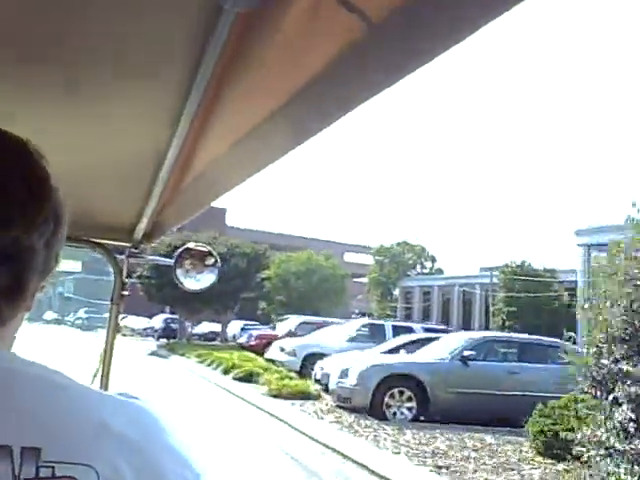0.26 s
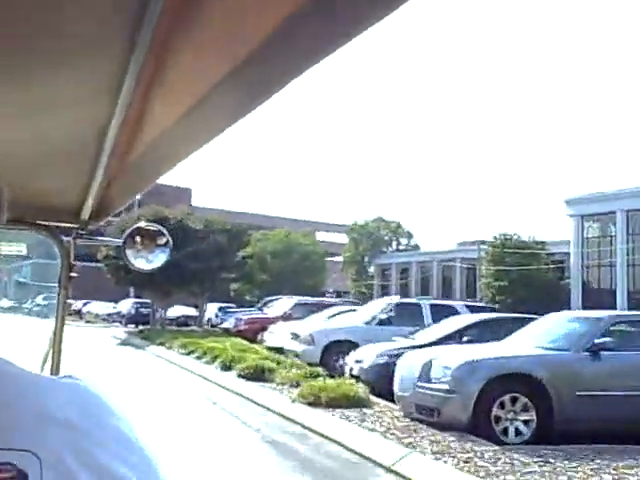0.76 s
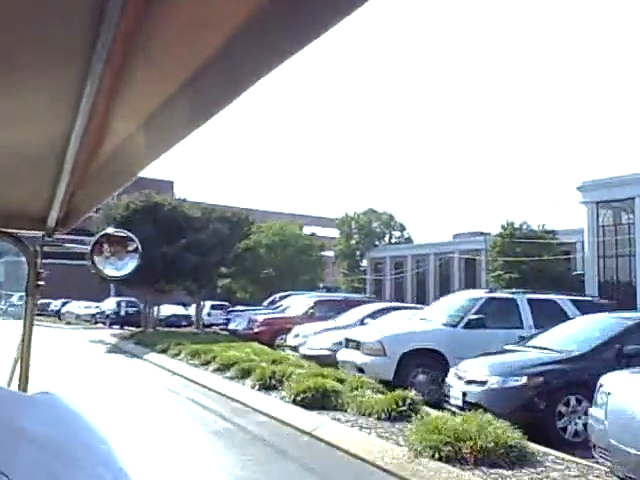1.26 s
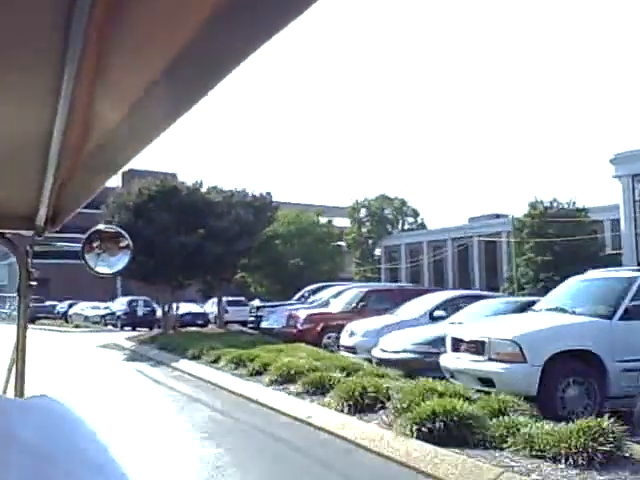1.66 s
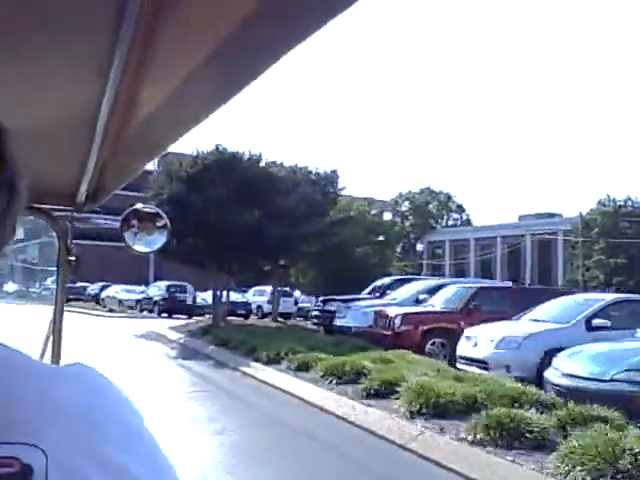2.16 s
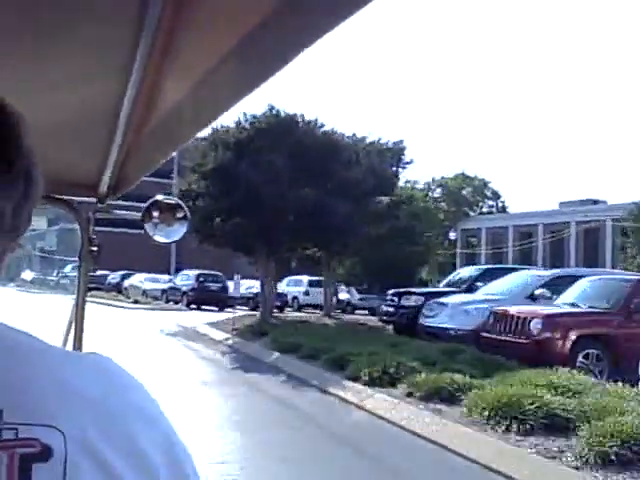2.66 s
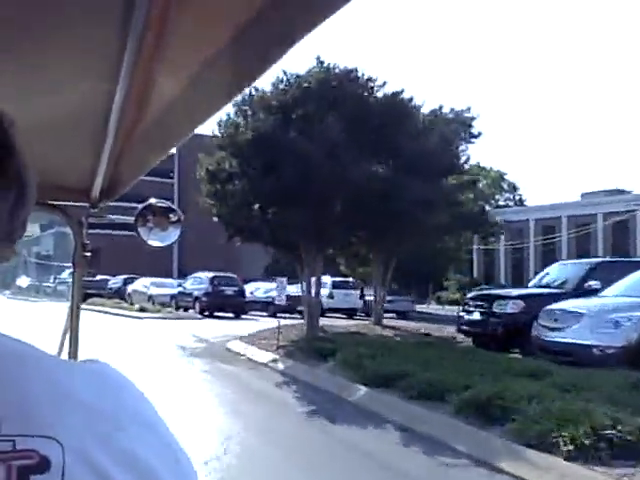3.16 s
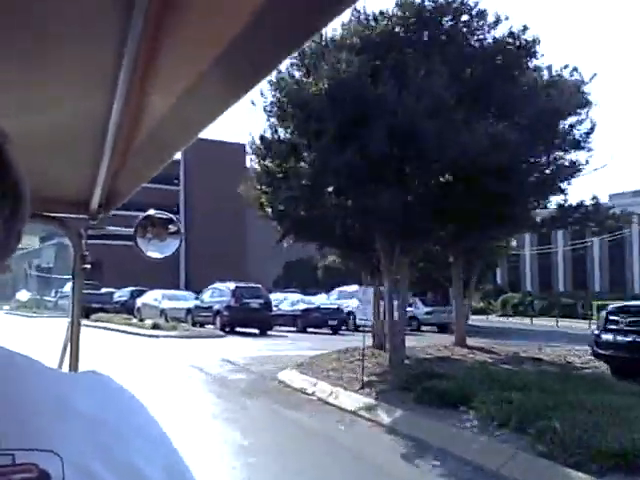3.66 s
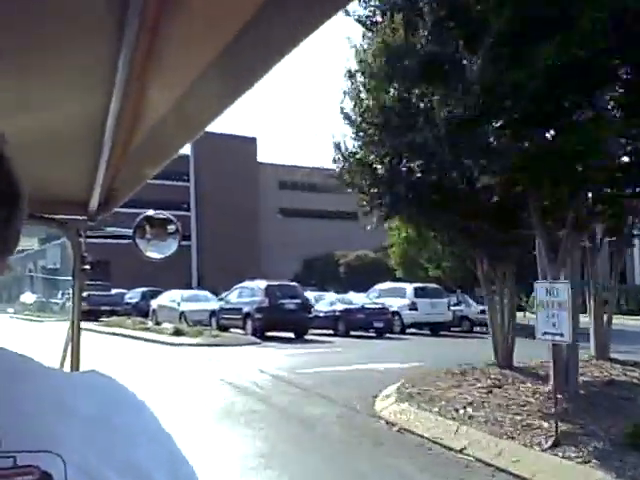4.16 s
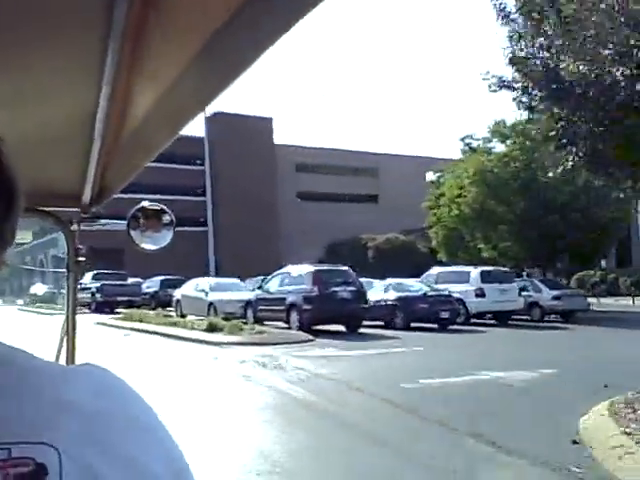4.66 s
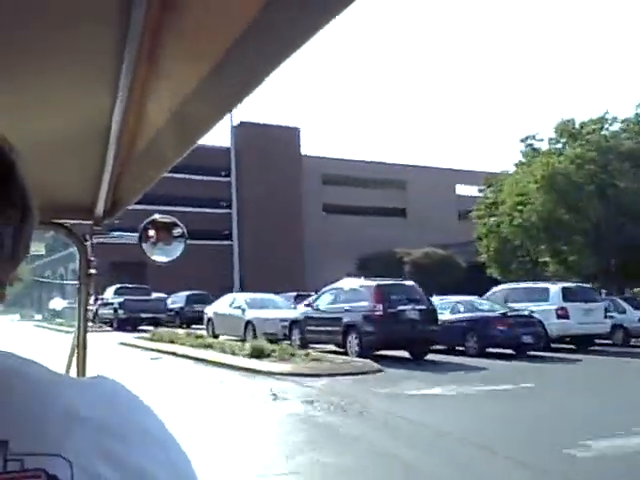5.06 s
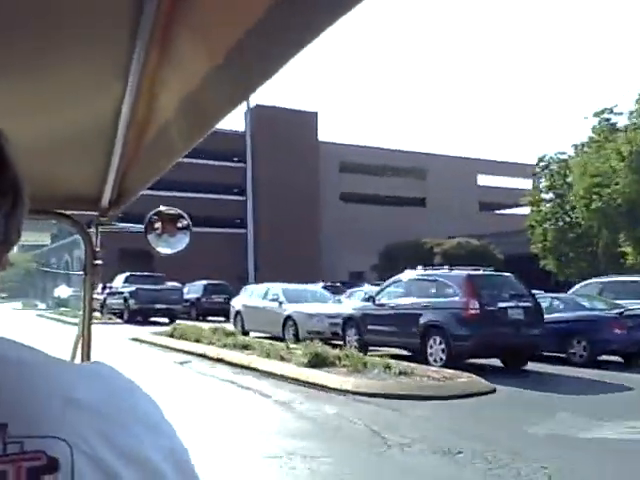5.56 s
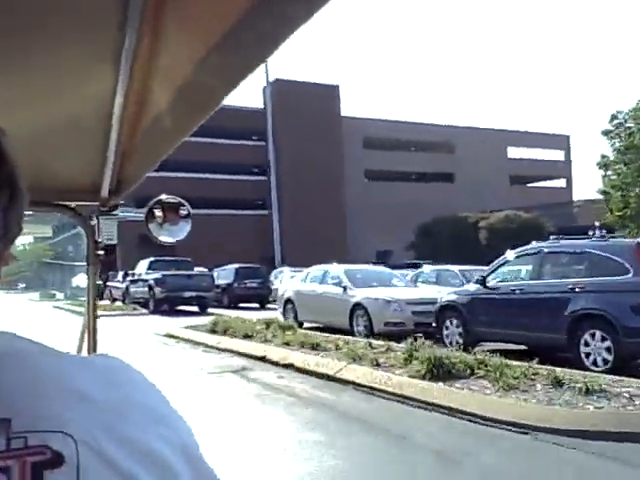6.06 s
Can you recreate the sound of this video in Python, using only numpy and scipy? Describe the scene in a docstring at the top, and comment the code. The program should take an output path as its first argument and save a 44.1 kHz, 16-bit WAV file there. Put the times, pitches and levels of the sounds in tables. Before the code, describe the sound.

Inside a slow open-sided shuttle outdoors, a low eight-cylinder throb near 60 hertz wavers gently beneath continuous fan, tyre and body roar. From about 0.1 to 0.9 seconds, wind hits the bare microphone in dense fluttering thuds and crackles, the hardest near 0.35, with a tiny roof squeak and metallic clink around 0.4 and another near 0.7. Calmer rumble follows until 1.7, when a second run of buffets lasts to about 2.4, with a faint squeak near 2.1. Then mostly engine and road roar, with small loose-metal ticks around 2.6 to 3.4. A sharp wind thump lands near 3.9, a clear clink near 4.6, and clustered gusts from 4.9 to 5.6. The engine drops slightly in pitch and softens around 5.4, then recovers as low, soft wind thuds arrive near 6.1. Close small-camera sound, with rounded peaks and limited treble.

```python
"""Open-sided shuttle in a car park

An open-sided shuttle rolls slowly, heard by a small camera on a passenger seat. Fan, tyre and body roar is
banded noise; gusts and sharp eddies on the bare microphone are noise swells and band-limited pressure spikes.
Loose fittings clink as struck modes, a roof joint squeaks in overtones, and an eight-cylinder engine throbs
near idle as a stack of wavering order lines.
"""
import sys
import numpy as np
from scipy import signal
from scipy.fft import rfft, irfft
from scipy.io import wavfile
from scipy.ndimage import uniform_filter1d

SR = 44100
rng = np.random.default_rng(int(sys.argv[2]) if len(sys.argv) > 2 else 0)


def persist_wave(psi):
    """Save psi, clipped to +-1, as 16-bit WAV."""
    counts = np.round(np.clip(psi, -1, 1) * 32767).astype(np.int16)
    wavfile.write(sys.argv[1], SR, np.atleast_2d(counts).T)


N = 277830


def undb(db):
    """Decibels to amplitude."""
    return 10 ** (np.asarray(db) / 20)


def unit(x):
    """Scale to rms 1."""
    return x / np.sqrt(np.mean(x ** 2))


def curves(table):
    """Columns of a table joined by straight lines in time."""
    time_s, *columns = np.transpose(table)
    return [np.interp(np.arange(N) / SR, time_s, column) for column in columns]


def band(x, lo_hz, hi_hz, order=2):
    """Band-pass."""
    sos = signal.butter(order, [lo_hz, min(hi_hz, SR / 2.2)], "band", fs=SR, output="sos")
    return signal.sosfilt(sos, x)


def walk(rate_hz):
    """Random levels held 1 / rate_hz, smoothed twice; rms 1."""
    hold = int(SR / rate_hz)
    steps = np.repeat(rng.standard_normal(N // hold + 1), hold)
    return unit(uniform_filter1d(uniform_filter1d(steps, hold), hold)[:N])


def humps(peak_s, peak_db, rise_s, fall_s):
    """Summed power of exponential swells that peak at the given moments."""
    grid = np.arange(0, N, 32)
    t = grid / SR - np.asarray(peak_s)[:, None]
    shape = np.exp(np.where(t < 0, 2 * t / rise_s, -2 * t / fall_s))
    power = undb(2 * np.asarray(peak_db)) @ shape
    return np.interp(np.arange(N), grid, power)


# fan, tyre and body roar, relative spectrum: (frequency [Hz], density [dB per Hz])
ROAR_SPECTRUM = [(25, -25.5), (60, -16), (120, -19), (190, -16), (290, -23), (450, -37), (650, -27),
                 (800, -36.5), (1250, -35), (2100, -56), (3000, -47.5), (3700, -55), (4400, -62.5),
                 (5700, -54.5), (6600, -54), (7300, -73)]
ROAR_DB, FLICKER_DB = -30, 0.91


def roar(turn):
    """Third-octave noise bands flicker independently; valve gear pulses the roar at each firing."""
    out, (table_hz, table_db) = 0, np.transpose(ROAR_SPECTRUM)
    for hz in 25 * 2 ** (np.arange(26) / 3):
        density_db = np.interp(np.log(hz), np.log(table_hz), table_db)
        # bandwidth grows with hz
        db = density_db + 10 * np.log10(hz) + FLICKER_DB * walk(12)
        noise = band(rng.standard_normal(N), hz * 2 ** (-1 / 6), hz * 2 ** (1 / 6))
        out = out + undb(db) * unit(noise)
    pulse = 1 + 0.077 * np.cos(2 * np.pi * CYLINDERS * turn + 1.3)
    return undb(ROAR_DB) * unit(out) * pulse


# gust strength between the sharp eddies, drives all wind bands: (time [s], level [dB])
GUSTS = [(0, -47), (.09, -29.5), (.5, -31.5), (.93, -34), (1.05, -36.5), (1.4, -41), (1.62, -34.5),
         (1.7, -30.5), (2.36, -36.5), (2.46, -41.5), (2.8, -41), (2.93, -31), (3.3, -40), (3.65, -38.5),
         (4.1, -36.5), (4.3, -39.5), (4.65, -42), (4.75, -37.5), (5.1, -35), (5.25, -30.5), (5.38, -34.5),
         (5.45, -39), (5.95, -40.5), (6.05, -32.5), (6.15, -41.5), (6.3, -39)]
# strongest shoves of slow pressure, before SLOW_TRIM_DB: (time [s], level [dB])
SHOVES = [(.12, -17), (.19, -17.5), (0.351, -13.5), (.44, -23.5), (.51, -18), (.63, -32), (.86, -22),
          (.97, -33), (1.84, -23), (2.02, -27), (2.09, -18), (2.28, -17), (2.38, -16.5), (3.39, -20),
          (4.7, -20), (5.54, -21), (6.021, -25), (6.16, -20)]
SHOVE_S = 0.045  # rise and fall
SWELL_DB, SWELL_WANDER_DB, SLOW_TRIM_DB = 1.5, 3, -0.8  # swell is relative to the gust
# stream swell around each sharp eddy, level relative to its thud
WAKE_DB, WAKE_RISE_S, WAKE_FALL_S = -11.5, 0.0059, 0.015


def wind():
    """Small eddies roll over the capsule in an uneven stream; slow pressure swells lie under them."""
    calm_db, = curves(GUSTS)
    eddy_s, _, thud_db, *_ = np.transpose(SHARP_EDDIES)
    stream_db = calm_db + 2.7 * walk(14)
    wakes = humps(eddy_s, thud_db + WAKE_DB, WAKE_RISE_S, WAKE_FALL_S)
    gust_db = 10 * np.log10(undb(2 * stream_db) + wakes)
    swell_db = calm_db + SWELL_DB + SWELL_WANDER_DB * walk(8.5)
    swell_power = undb(2 * swell_db) + humps(*np.transpose(SHOVES), SHOVE_S, SHOVE_S)
    jag_db = 1.5 * (walk(90) + .7 * walk(250))
    noise = rng.standard_normal((4, N))
    low = unit(band(noise[0], 90, 230)) * undb(0.4 * gust_db + 0.38 * calm_db - 4.0)
    mid = unit(band(noise[1], 210, 480)) * undb(gust_db - 1.0)
    # stronger gusts shed smaller eddies, so the upper band grows faster than the gust
    upper = unit(band(noise[2], 620, 1400)) * undb(1.22 * gust_db - 10.5)
    slow = unit(band(noise[3], 18, 48)) * np.sqrt(swell_power) * undb(SLOW_TRIM_DB)
    return undb(jag_db) * (low + mid + upper) + slow


SMALL_PER_S, SMALL_HZ = 40, 450
SMALL_DB, SMALL_SPREAD_DB = 3, 2.5  # thud relative to the gust
SMALL_SNAP_DB, SMALL_CRACK_DB = -19, -28  # relative to the thud


def small_eddies():
    """Rows like the sharp eddies, at random moments, their strength following the gust."""
    count = int(SMALL_PER_S * N / SR)
    time_s = .02 + rng.random(count) * (N / SR - .02)
    a, b, c = rng.standard_normal((3, count))
    thud_db = np.interp(time_s, *np.transpose(GUSTS)) + SMALL_DB + SMALL_SPREAD_DB * a
    snap_db = thud_db + SMALL_SNAP_DB + 3.1 * b
    crack_db = thud_db + SMALL_CRACK_DB + 4.4 * b
    return np.transpose([time_s, SMALL_HZ * 2 ** (0.45 * c), thud_db, snap_db, crack_db])


# sharpest eddies, levels before the part gains:
# (time [s], thud pitch [Hz], thud peak [dB], snap peak [dB], crack peak [dB])
SHARP_EDDIES = [(0.0852, 520, -17, -32, -41), (0.1134, 610, -15.5, -26, -38),
                (0.1854, 570, -15.5, -44, -42), (0.1647, 400, -32, -37, -46), (0.1976, 420, -17, -31, -42),
                (0.203, 420, -14, -24, -30), (0.2105, 420, -21, -32, -42), (0.224, 620, -17, -27, -39),
                (0.2442, 430, -22, -26, -45), (0.352, 520, -7, -10, -25), (0.3612, 553, -12, -9.5, -37),
                (0.3972, 520, -11.5, -34, -40), (0.4162, 400, -25, -29, -41),
                (0.4353, 490, -12.5, -23.5, -35), (0.467, 436, -17, -39, -48), (0.4961, 580, -24, -36, -44),
                (0.5087, 696, -16, -32, -43), (0.5337, 560, -15, -27, -39), (0.5629, 630, -15.5, -46, -34),
                (0.614, 595, -27, -30, -46), (0.6318, 450, -13, -16, -31), (0.6352, 430, -8.5, -28, -40),
                (0.7082, 358, -15, -37, -47), (0.7456, 440, -15.5, -39, -31),
                (0.7483, 513, -12.5, -39, -35), (0.768, 450, -17.5, -23, -41), (0.7806, 503, -15, -23, -38),
                (0.816, 390, -21, -19, -41), (0.8469, 525, -9.5, -33, -33), (0.8509, 470, -11, -20, -29),
                (0.863, 520, -24, -36, -47), (0.907, 390, -12, -25, -45), (0.93, 450, -24, -41, -50),
                (1.6893, 470, -21, -43, -42), (1.7, 580, -9, -32, -32), (1.7085, 450, -13, -27, -42),
                (1.7284, 480, -12, -22, -34), (1.753, 600, -18.5, -28, -44), (1.7775, 730, -15.5, -33, -36),
                (1.7856, 645, -14, -40, -41), (1.8518, 448, -15, -30, -41), (1.8811, 540, -10.5, -31, -37),
                (1.9248, 410, -14, -39, -47), (2.0124, 560, -15, -11, -28.5),
                (2.0225, 660, -12.5, -26, -34), (2.035, 443, -23, -33, -46), (2.0432, 640, -15.5, -31, -40),
                (2.0886, 390, -14.5, -25, -38), (2.1026, 570, -17, -33, -37),
                (2.1357, 580, -14.5, -39, -43), (2.1768, 500, -18.5, -38, -33),
                (2.1838, 530, -14.5, -12, -38), (2.197, 440, -14, -32, -32), (2.209, 510, -15, -32, -44),
                (2.215, 600, -28, -29, -42), (2.235, 680, -20, -34, -46), (2.247, 517, -16, -32, -45),
                (2.2599, 420, -13.5, -20, -31), (2.2645, 600, -21, -15.5, -36),
                (2.2885, 400, -19, -24, -42), (2.2933, 430, -10, -21, -37), (2.3155, 402, -13, -31, -50),
                (2.3248, 420, -24, -28, -51), (2.3407, 400, -13.5, -26, -48),
                (2.3472, 420, -15.5, -29, -44), (2.3525, 500, -24.5, -41, -36),
                (2.409, 506, -16.5, -42, -36), (3.391, 373, -21, -41, -51), (3.439, 348, -18, -40, -40),
                (3.8065, 370, -16.5, -33, -43), (3.8605, 680, -7.5, -17.5, -26.5),
                (3.8661, 680, -11, -34, -37), (3.9976, 500, -24.5, -29, -57), (4.1819, 362, -19, -40, -53),
                (4.7184, 380, -17.5, -38, -51), (4.8972, 420, -16.5, -41, -39),
                (4.972, 450, -13.5, -18, -37), (4.9957, 470, -17, -22, -32), (5.0069, 430, -11, -18, -33),
                (5.0186, 550, -12, -25, -40), (5.096, 580, -26, -26, -46), (5.1015, 546, -23, -31, -38),
                (5.1085, 500, -20, -35, -37), (5.1145, 450, -12.5, -28, -35), (5.1245, 520, -16, -31, -36),
                (5.158, 580, -25, -39, -43), (5.1652, 480, -22, -40, -43), (5.2081, 510, -14, -38, -39),
                (5.2154, 536, -19.5, -36, -47), (5.2417, 600, -23, -44, -30), (5.3, 450, -17, -40, -48),
                (5.345, 500, -22, -38, -48), (5.393, 433, -23, -42, -46), (5.5673, 600, -16.5, -32, -35),
                (5.5827, 540, -17, -31, -41), (6.045, 190, -16, -37, -51), (6.09, 190, -16, -42, -50),
                (6.14, 178, -18, -44, -52)]
# envelopes of thud, snap and crack: (rise [s], fall [s], gain [dB])
EDDY_PARTS = [(0.0026, 0.0024, -0.5), (0.0019, 0.0018, -6.5), (0.00069, 0.0052, 5)]
SNAP_HZ, CRACK_HZ = 1210, 3370
SPIKE = 20  # multiple of a random draw


def buffets():
    """A sharp eddy is a pressure spike in noise, split into thud, snap and crack around one moment."""
    size, lead = 2048, 512
    out, t = np.zeros(N + size), (np.arange(size) - lead) / SR
    octaves = np.log2(np.arange(1, size // 2 + 2) * SR / size)
    shapes = [np.where(t < 0, np.exp(-(t / rise_s) ** 2), np.exp(-np.abs(t) / fall_s))
              for rise_s, fall_s, _ in EDDY_PARTS]
    for time_s, thud_hz, *parts_db in [*SHARP_EDDIES, *small_eddies()]:
        pressure = rng.standard_normal(size)
        pressure[lead] = SPIKE * np.sign(pressure[lead])
        start = int(time_s * SR) - lead
        bands = [(thud_hz, .55), (SNAP_HZ, .42), (CRACK_HZ, .85)]  # (centre [Hz], width [octaves])
        for db, (hz, width), shape, (_, _, gain_db) in zip(parts_db, bands, shapes, EDDY_PARTS):
            weight = np.exp(-((octaves - np.log2(hz)) / width) ** 2 / 2)
            wavelet = shape * irfft(rfft(pressure) * weight)
            out[start:start + size] += undb(db + gain_db) * wavelet / np.abs(wavelet).max()
    return out[:N]


# slips of a roof frame joint: (time [s], nominal level [dB], starting pitch [Hz], length [s])
SQUEAKS = [(0.395, -40, 1423, 0.026), (0.689, -41, 1450, 0.011), (2.108, -38.5, 1380, 0.0093)]
# overtones of a squeak: (multiple of pitch, relative level [dB])
SQUEAK_TONE = [(1, 12), (2, 5), (3, -4), (4, -5.5)]
SQUEAK_SAG_PER_S = 3.5  # share of starting pitch


def squeaks():
    """Regular stick-slip gives a brief stack of overtones with an unsteady pitch."""
    size = 4096
    out, t = np.zeros(N), np.arange(size) / SR
    for time_s, db, hz, length_s in SQUEAKS:
        wobble = uniform_filter1d(rng.standard_normal(size), 60)
        phase = 2 * np.pi * np.cumsum(hz * (1 + 0.43 * wobble - SQUEAK_SAG_PER_S * t)) / SR
        stack = sum(undb(g) * np.sin(k * phase) for k, g in SQUEAK_TONE) / 2
        roughness = 1 + 2.3 * uniform_filter1d(rng.standard_normal(size), 40)
        envelope = (1 - np.exp(-t / 0.0023)) * np.exp(-(t / length_s) ** 4)
        start = int(time_s * SR)
        out[start:start + size] += undb(db) * stack * roughness * envelope
    return out


# touches of loose metal fittings: (time [s], nominal peak [dB], ringing share [0-1])
CLINKS = [(0.395, -24.5, 0.3), (0.689, -31, 0.26), (0.7791, -32, 0.1), (1.1987, -32, 0.15),
          (1.2396, -32, 0.3), (1.682, -26, 0.3), (1.7779, -30, 0.3), (2.1093, -33, 0), (2.4067, -31, 0.3),
          (2.594, -33.5, 0.4), (2.936, -31.5, 0.3), (3.207, -31.5, 0.4), (3.218, -32, 0.25),
          (3.27, -34, 0.25), (3.3616, -34, 0.4), (4.5932, -26.5, 0.24), (4.6245, -34.5, 0.4),
          (5.2405, -29.5, 0.2), (5.2889, -37, 0.5), (5.7653, -32, 0.2), (5.7947, -33, 0.2)]
# modes of a fitting: (frequency [Hz], relative level [dB], t60 [s])
FITTING_MODES = [(2910, 6, 0.042), (3520, -0.5, 0.1), (3930, -3, .05), (5250, -13, .05), (5770, -1, 0.025),
                 (6390, 0.5, 0.063)]


def clinks():
    """A short scrape of contact excites the fitting's modes, differently at each touch."""
    size = 4096
    out, t = np.zeros(N + size), np.arange(size) / SR
    for time_s, db, ring_share in CLINKS:
        touch = rng.standard_normal(size) * np.exp(-t / 0.0042)
        chance = rng.standard_normal((len(FITTING_MODES), 2))
        modes = 0
        for (hz, mode_db, t60_s), (a, b) in zip(FITTING_MODES, chance):
            decay = np.exp(-np.log(1000) * t / t60_s)
            modes = modes + undb(mode_db + a) * decay * np.sin(2 * np.pi * hz * (1 + 0.0042 * b) * t)
        ring = signal.fftconvolve(touch, modes)[:size]
        tick = band(touch, 1900, 11000)
        share = np.clip(ring_share, 0, 1)
        hit = share * ring / np.abs(ring).max() + (1 - share) * tick / np.abs(tick).max()
        start = int(time_s * SR)
        out[start:start + size] += undb(db) * hit
    return out[:N]


# engine speed: (time [s], firing rate [Hz])
FIRING = [(0.0, 61.31), (0.8, 60.32), (1.6, 60.71), (2.4, 60.28), (3.2, 59.93), (4.0, 60.01), (4.8, 59.7),
          (5.2, 59.55), (5.35, 57.49), (5.55, 55.12), (6.3, 55.92)]
# engine orders before load gain: (multiple of the two-turn cycle, level [dB rms])
ENGINE_ORDERS = [(4, -47.9), (5, -46), (7, -45.9), (8, -24.0), (9, -34.3), (10, -36.4), (11, -40.9),
                 (12, -30.7), (14, -41.2), (16, -44.4), (17, -43.5), (18, -47.3), (19, -41.7), (20, -42.4),
                 (21, -35.8), (22, -46.2), (23, -40.8), (24, -39.4), (25, -46.2), (27, -37.3), (29, -46.5)]
# engine load: (time [s], gain [dB])
LOAD = [(0, 0), (2.4, 1), (5.2, 0), (5.5, -3.5), (6.3, 0.5)]
CYLINDERS, START_CYCLES = 8, .08
PIPE_LAG = .37  # exhaust pipe dispersion [rad per order squared]


def engine():
    """Unequal cylinders give lines at multiples of the cycle; the higher ones leave the pipe later."""
    firing_hz, = curves(FIRING)
    turn = START_CYCLES + np.cumsum(firing_hz) / SR / CYLINDERS
    out = 0
    for k, db in ENGINE_ORDERS:
        lag = PIPE_LAG * (k - CYLINDERS) * (k - CYLINDERS - 2)
        # combustion never repeats exactly, so each line wavers in size and timing
        size = undb(.6 * walk(8))
        line = size * np.cos(2 * np.pi * k * turn - lag + .004 * k * walk(5))
        out = out + np.sqrt(2) * undb(db) * line
    return out * undb(curves(LOAD)[0]), turn


def scene():
    """Everything reaches the one microphone in the open air."""
    throb, turn = engine()
    return (roar(turn) + wind() + buffets() + squeaks() + clinks() + throb)[None]


SOFT_TOP_HZ, TOP_HZ = 6750, 7400


def record(dry):
    """The camera rounds the strongest peaks and cuts the top steeply."""
    rounded = np.tanh(0.79 * dry) / 0.8
    soft = signal.sosfilt(signal.butter(10, SOFT_TOP_HZ, fs=SR, output="sos"), rounded)
    return signal.sosfilt(signal.ellip(8, .2, 70, TOP_HZ, fs=SR, output="sos"), soft)


dry = scene()
out = record(dry)
persist_wave(out)
```